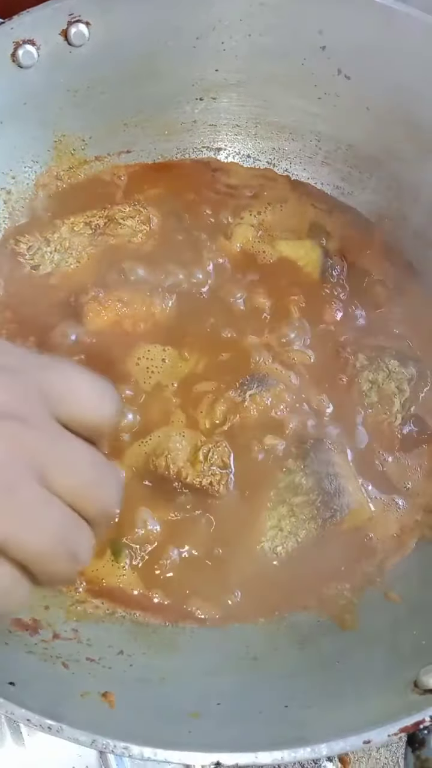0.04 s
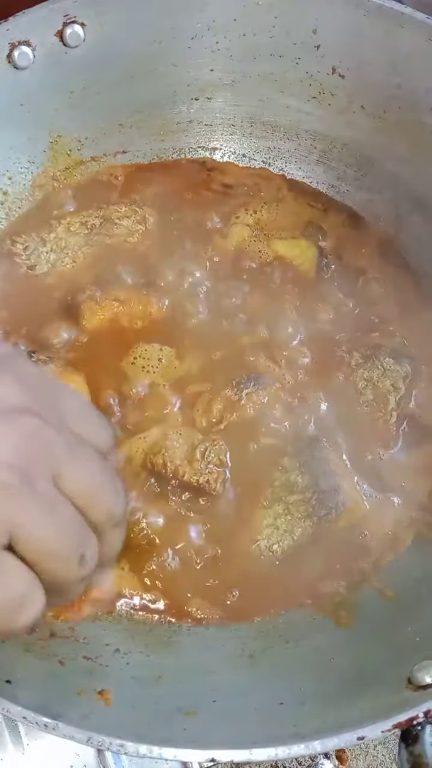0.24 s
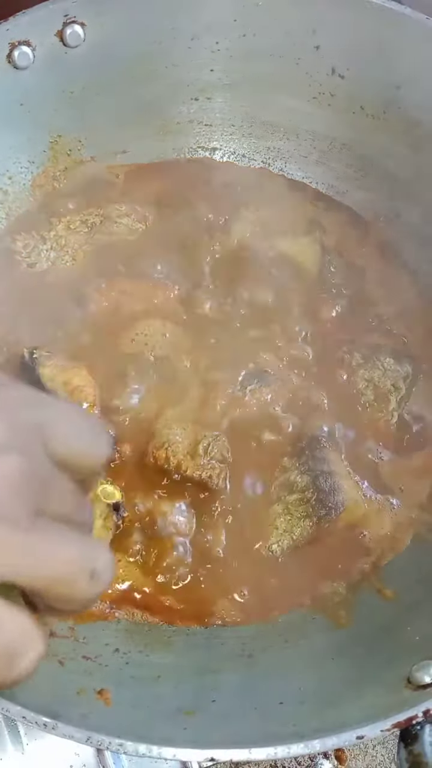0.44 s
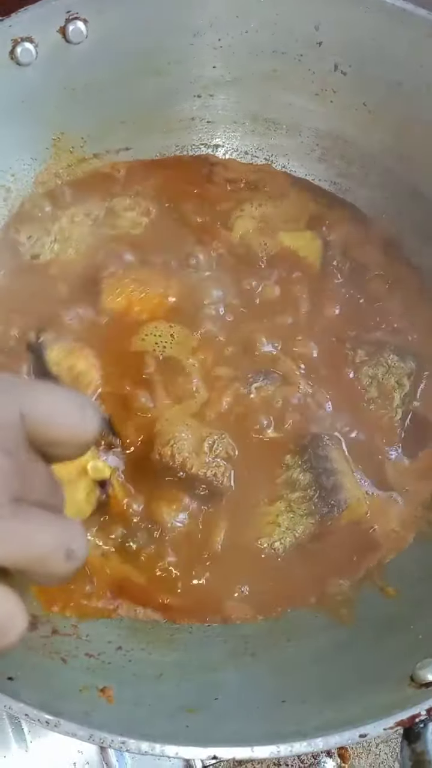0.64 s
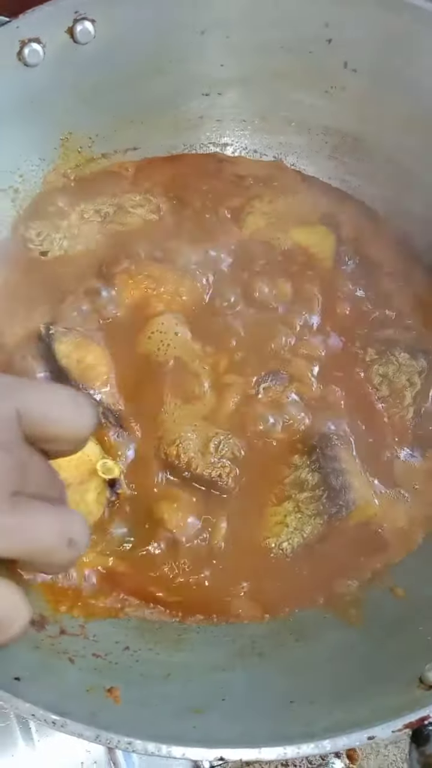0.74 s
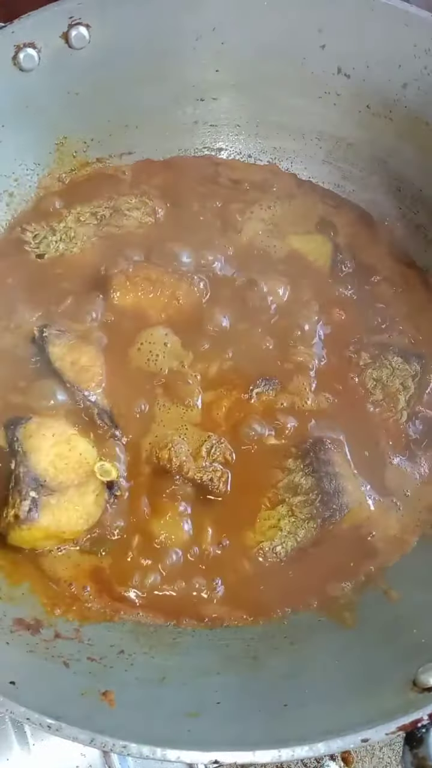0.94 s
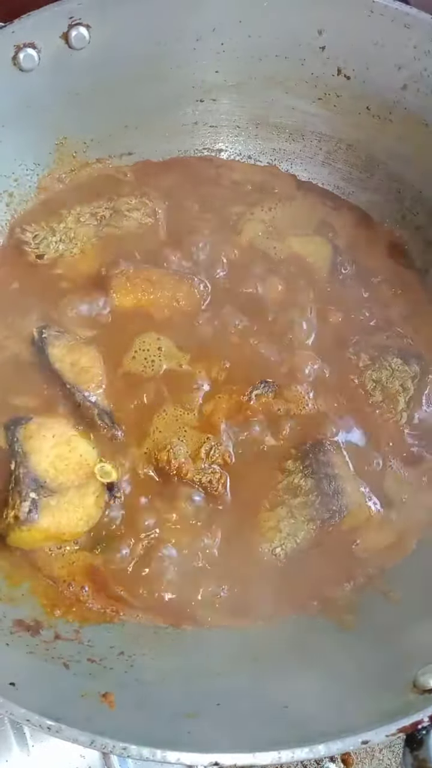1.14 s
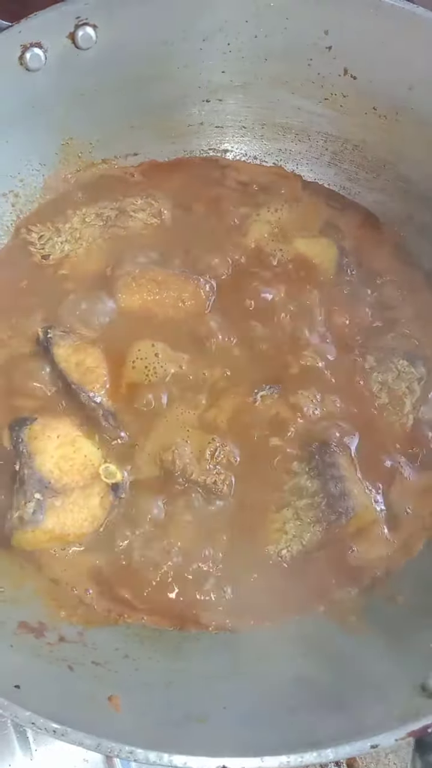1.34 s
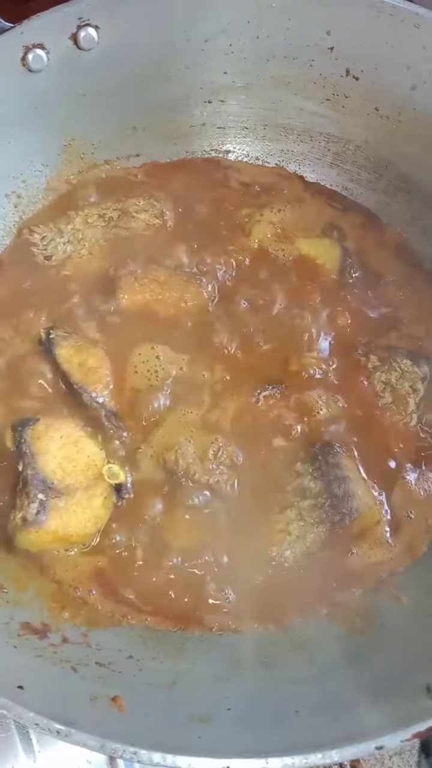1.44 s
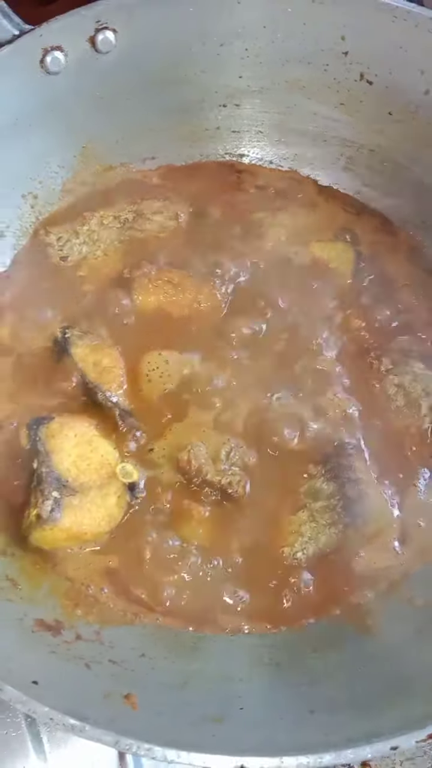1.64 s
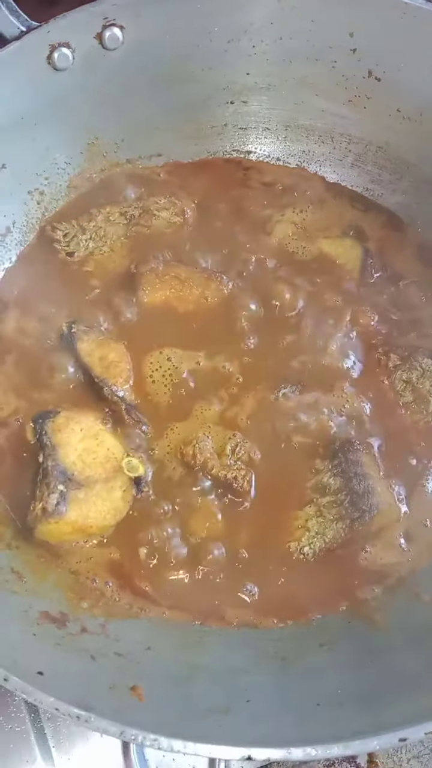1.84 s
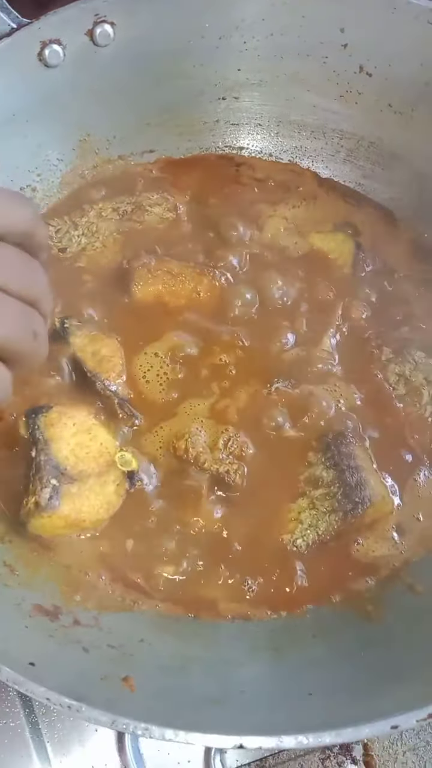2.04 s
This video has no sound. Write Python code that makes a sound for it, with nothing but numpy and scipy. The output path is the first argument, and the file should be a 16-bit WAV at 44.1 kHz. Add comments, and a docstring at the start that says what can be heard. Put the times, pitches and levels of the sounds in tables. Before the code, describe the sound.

Close above a metal pan in a small kitchen, thick sauce bubbles with small wet pops and light fizzing. A brief crackling spit and low gulp come as a piece of fish goes in, then the quiet bubbling carries on.

```python
"""In a small kitchen, thick gravy boils in a wide metal pan while a piece of fish is slipped into it.
Each bubble is a briefly excited resonator: bursting ones pop, big ones gulp low in the sauce, and tiny
oil films tick and fizz. Once the gravy spits in sharp cracks of noise and sloshes around the fish.
The damped modes of the pan and the reverberation of the room prolong these sounds over a soft low wash."""
import sys
import numpy as np
from scipy import signal
from scipy.fft import rfft, irfft, next_fast_len
from scipy.io import wavfile

SR = 44100
rng = np.random.default_rng(int(sys.argv[2]) if len(sys.argv) > 2 else 0)


def file_out(sig):
    """Save sig as 16-bit WAV at sys.argv[1]."""
    # one column per channel
    cols = np.atleast_2d(sig).T
    # limit, then scale
    lim = np.clip(cols, -1, 1)
    pcm = np.round(lim * 32767).astype(np.int16)
    wavfile.write(sys.argv[1], SR, pcm)


N = 92610

TOP_HZ = 15600
TICK_GLIDE, POP_GLIDE = 0.031, 0.0083  # fractional rise in frequency per rise time
# bursting bubbles: t/s, f/Hz, peak level/dB, rise/cycles
BURSTS = [(.021, 1500, -53, 3), (.0376, 1550, -59.5, 2.9), (.0515, 1520, -55, 1.73),
          (.0686, 1593, -54, 1.76), (.0845, 1644, -41, 4), (.1632, 1553, -46.5, 3), (.203, 1580, -39, 4.5),
          (.2335, 3240, -43, 2.1), (.2361, 2310, -39, 2.55), (.323, 2400, -54, 4), (.352, 1539, -47, 3.3),
          (.3783, 1550, -44.5, 5), (.434, 1680, -40.5, 2.14), (.5494, 2400, -51.5, 3),
          (.5636, 1580, -45, 2.95), (.6145, 1590, -48.5, 5.4), (.6283, 1470, -55, 4),
          (.6772, 1120, -46.5, 1.7), (.713, 1630, -46, 4.8), (.7709, 1290, -52, 1.9),
          (.8393, 1530, -46, 2.58), (.84, 1990, -56, 2.9), (.8537, 1580, -67, 3.6),
          (.855, 1960, -53.5, 4.7), (.935, 1320, -55.5, 2.62), (.9756, 1440, -42.5, 1.9),
          (1.0174, 1570, -46.5, 0.91), (1.02, 690, -58.5, 3.9), (1.0992, 1065, -56, 3.3),
          (1.1207, 1510, -44, 2.1), (1.1247, 1550, -44, 2.6), (1.2106, 1530, -48, 0.76),
          (1.213, 740, -55.5, 3.86), (1.2227, 1390, -46.5, 2.35), (1.2565, 2110, -39.5, 2.14),
          (1.258, 1326, -38, 3.27), (1.2725, 1400, -80, 3), (1.324, 1470, -55.5, 3),
          (1.4081, 1990, -51.5, 2.1), (1.41, 1015, -59.5, 4.5), (1.489, 1320, -57, 3),
          (1.826, 1260, -58, 3), (1.867, 1370, -43, 2.62), (1.919, 1310, -53, 4), (1.921, 826, -60, 4),
          (1.99, 970, -60.5, 5.7), (2.027, 2050, -55, 4), (2.078, 710, -55.5, 1.53)]
# small films snapping at the surface: t/s, f/Hz, peak level/dB
FILM_SNAPS = [(.0095, 8900, -44.5), (0.0313, 7891, -46), (.1002, 7400, -49), (0.1209, 6500, -41.5),
              (0.1367, 3300, -42), (.1446, 6550, -40), (.186, 8100, -47.5), (0.2169, 3640, -43),
              (0.2369, 3514, -29.5), (0.2535, 6700, -38.5), (0.2626, 6600, -38), (0.311, 7700, -48),
              (0.349, 3720, -39), (.349, 6500, -37), (.3523, 6450, -33), (0.373, 6140, -45),
              (0.3817, 7260, -37), (.5744, 6740, -40.5), (0.5805, 6300, -42), (0.5973, 6804, -39.5),
              (0.6077, 5400, -49.5), (0.6495, 3850, -48), (0.6875, 4170, -51), (0.717, 8000, -43.5),
              (0.807, 5860, -47), (0.9458, 3440, -51.5), (0.9786, 6380, -39), (1.065, 4100, -52.5),
              (1.157, 6740, -43), (1.2071, 7040, -45.5), (1.2443, 5500, -42), (1.2691, 5500, -61),
              (1.2895, 7741, -44), (1.3262, 5221, -46.5), (1.339, 5460, -60), (1.3495, 6500, -45),
              (1.356, 6760, -41.5), (1.3941, 9340, -42), (1.4474, 5800, -59), (1.4592, 5900, -40),
              (1.538, 6300, -45.5), (1.5723, 6660, -37.5), (1.5845, 7200, -41), (1.596, 6800, -44.5),
              (1.672, 6200, -49.5), (1.8134, 8100, -46), (1.8631, 4950, -47.5), (1.896, 3500, -53),
              (1.9618, 6560, -39), (1.9794, 5440, -45.5), (2.0607, 5760, -46.5)]


def undb(db):
    """Amplitude ratio of a level in decibels."""
    return 10 ** (np.asarray(db) / 20)


def unit(x):
    """Normalisation to an rms of 1."""
    return x / np.sqrt(np.mean(x ** 2))


def colour(x, points):
    """Spectral shaping by (f/Hz, gain/dB) points joined on a log-frequency axis."""
    hz, db = np.array(points, float).T
    size = next_fast_len(2 * len(x))
    f = np.maximum(np.fft.rfftfreq(size, 1 / SR), 1)
    gain = undb(np.interp(np.log(f), np.log(hz), db))
    return irfft(rfft(x, size) * gain, size)[:len(x)]


def swell(u):
    """Transient envelope: growth from u = 0 to a peak of 1 at u = 1, then exponential decay."""
    u = np.maximum(u, 0)
    return (u * np.exp(1 - u)) ** 2


def bubbles(rows, glide, wobble_rad=0):
    """Cavity resonance, rising as the cavity opens. Rows: t/s, f/Hz, peak level/dB, rise/cycles."""
    out, drift = np.zeros(N), np.zeros(N)
    if wobble_rad:  # unsteady phase of a collapsing cavity
        steps, steps_per_s = rng.standard_normal(N // 20), 457.3
        drift = wobble_rad * np.interp(np.arange(N) * steps_per_s / SR, np.arange(len(steps)), steps)
    for at, hz, db, cycles in rows:
        rise = max(cycles, .5) / hz
        i = np.arange(max(int((at - rise) * SR), 0), min(int((at + 6 * rise) * SR), N))
        age = i / SR - at
        phase = 2 * np.pi * hz * (age + rise + glide * age ** 2 / rise / 2)
        out[i] += undb(db) * swell(1 + age / rise) * np.sin(phase + drift[i])
    return out


def activity(t):
    """Slow amplitude modulation: how hard the gravy boils at time t, in dB."""
    # vigour of the boil: t/s, relative level/dB
    vigour = [(0, 4), (.3, 2.5), (.45, 9.5), (.6, 5), (.76, -2), (.9, -0.5), (1.0, 2.5), (1.15, -2),
              (1.35, 3), (1.55, 0.5), (1.75, -2.5), (1.95, 2), (2.1, 1)]
    return np.interp(t, *np.array(vigour).T)


def pan_and_kitchen(x):
    """Convolution adds the damped modes of the pan and the dense reflections from nearby walls."""
    # modes of the pan: f/Hz, T60/s, relative level/dB
    modes = [(207, 0.1, -6), (690, 0.21, -12), (1380, 0.26, -3), (2120, 0.19, -2), (3000, .3, -13),
             (3140, 0.31, -7), (3238, 0.24, -7), (3680, 0.43, -9), (5090, .45, 2), (5000, 0.57, -10),
             (5525, .4, -12), (5700, 0.26, -3), (5340, 0.46, -1), (5700, 0.39, -4), (6368, .4, -7),
             (6400, .35, -1), (7160, 0.27, -3)]
    # spectrum of the reverberation: f/Hz, relative level/dB
    room_spectrum = [(60, -20.5), (220, 5), (480, -7), (800, 6.5), (1500, 2.5), (2600, -3.5), (3400, 1.5),
                     (4500, -10), (5600, 13), (6100, -9), (6700, 1), (7300, -12), (7800, -6), (9000, -8),
                     (15000, 3)]
    t = np.arange(SR // 2) / SR
    fade = lambda t60: np.exp(-np.log(1000) * t / t60)
    ring = np.zeros(len(t))
    for hz, t60, db in modes:
        unity_gain = 2 * np.log(1000) / (t60 * SR)  # at resonance
        ring += undb(db) * unity_gain * fade(t60) * np.sin(2 * np.pi * hz * t)
    noise = rng.standard_normal(len(t))
    low = signal.sosfilt(signal.butter(2, 4000, fs=SR, output="sos"), noise)
    onset = np.clip(t / 0.001 - .5, 0, 1)  # first echoes after about 1 ms
    tail = (low * fade(t60=0.17) + (noise - low) * fade(t60=0.19)) * onset
    tail = colour(tail / np.sqrt(np.sum(tail ** 2)), room_spectrum)
    return x + signal.fftconvolve(x, undb(-4) * ring + undb(-4.5) * tail)[:N]


def wash():
    """Random noise: the low churn of the whole pan over the room's rumble follows the boil."""
    # churn and rumble: f/Hz, relative spectral level/dB
    spectrum = [(25, -30), (50, -8), (100, -3), (210, -1), (300, 1), (400, 3), (500, -6.5), (650, 5),
                (1000, -16.5), (1500, -7), (1900, -45), (4000, -16.5), (15000, -21)]
    level_db = -75.5 + 0.49 * activity(np.arange(N) / SR)
    return unit(colour(rng.standard_normal(N), spectrum)) * undb(level_db)


def fizz(clicks_per_s=6000, scatter_db=4):
    """Shot noise: frying oil films give countless minute clicks, coloured by the pan."""
    # fizz: f/Hz, relative spectral level/dB
    spectrum = [(100, -43), (1500, -13), (2000, -9.5), (2600, -17.5), (3400, -4.5), (4300, -13),
                (5000, 1.5), (5600, -3.5), (6100, -11.5), (6700, 12), (7300, -11.5), (7750, 8.5),
                (8600, -7), (10500, -3), (11300, -49), (15000, -43.5)]
    present = rng.random(N) < clicks_per_s / SR
    size = undb(scatter_db * np.minimum(rng.exponential(size=N), 5))
    clicks = present * size * rng.choice([-1, 1], N)
    return unit(colour(clicks, spectrum)) * undb(-68.5 + activity(np.arange(N) / SR))


def simmer():
    """Incoherent superposition: crowds of faint bubbles of every size ring at random moments."""
    # crowds: rate/(1/s), centre f/Hz, spread/octaves, base level/dB, scatter/dB, mean rise/cycles
    crowds = [(109.7, 1007, 0.43, -71.5, 2, 2.2), (61.2, 1454, 0.03, -65.5, 3, 3.014),
              (36.3, 3450, 0.061, -64.5, -0.5, 3.8), (85.5, 7600, 0.15, -58.5, 4, 2.23),
              (57.9, 211.7, 0.22, -78, -1.5, 2.59)]
    out = np.zeros(N)
    for rate, centre, spread, db, scatter, cycles in crowds:
        moment, strength, duration = rng.random((1500, 3)).T
        pitch = rng.standard_normal(len(moment))
        at = moment * N / SR
        hz = np.minimum(centre * 2 ** (spread * pitch), TOP_HZ)
        level_db = db + activity(at) + scatter * np.minimum(-np.log(1 - strength), 3)
        rows = np.c_[at, hz, level_db, cycles * (.5 + duration)]
        out += bubbles(rows[:int(rate * N / SR)], TICK_GLIDE)
    return out


def slosh(peak_s=0.458, rise_s=0.11):
    """Displacement noise: a low rumble swells and settles as the fish pushes the sauce aside."""
    # moving sauce: f/Hz, relative spectral level/dB
    spectrum = [(25, -25), (50, -11), (90, 2), (160, 0), (260, 0.5), (340, -6), (480, -15), (1500, -53)]
    envelope = swell(1 + (np.arange(N) / SR - peak_s) / rise_s)
    return unit(colour(rng.standard_normal(N), spectrum)) * envelope * undb(-62.5)


def gurgles(bubbles_per_s=95, spread_octaves=0.037, rise_cycles=2.6):
    """Steam working through the sauce excites quick runs of bubble resonances that slide in pitch."""
    # runs: t/s, length/s, first f/Hz, last f/Hz, peak level/dB
    runs = [(0.442, 0.038, 717, 718, -54), (0.519, 0.054, 266, 240, -68), (0.671, 0.047, 930, 1070, -59.5),
            (0.77, 0.044, 1130, 804, -58), (0.816, 0.021, 980, 1110, -54), (1.011, 0.031, 640, 610, -56.5),
            (1.199, 0.067, 860, 1050, -58.5), (1.362, 0.12, 820, 1064, -61), (1.613, .1, 1400, 1020, -63),
            (1.884, 0.029, 1420, 1300, -61.5)]
    out = np.zeros(N)
    for start, length, first, last, db in runs:
        jitter = rng.random(32)
        pitch, scatter_db = rng.standard_normal((2, 32))
        after = (np.arange(32) + jitter) / bubbles_per_s
        hz = np.interp(after, [0, length], [first, last]) * 2 ** (spread_octaves * pitch)
        rows = np.c_[start + after, hz, db + scatter_db, np.full(32, rise_cycles)]
        out += bubbles(rows[after < length], POP_GLIDE)
    return out


def splutters(snaps_per_s=400, rise_cycles=2.28):
    """Rapid trains of tiny damped oscillations. Those centred below 10 kHz are collapsing foam;
    the three above are brief patches of faint, very high hiss."""
    # trains: t/s, length/s, centre f/Hz, spread/octaves, peak level/dB
    trains = [(0.04, .03, 2520, 0.39, -56.5), (.21, .03, 3130, 0.42, -54), (0.358, .025, 4500, 0.41, -50),
              (.383, .012, 3800, 0.18, -31.5), (0.427, .075, 6030, 0.37, -45),
              (0.536, .025, 2410, 0.14, -57), (0.566, .02, 2770, 0.42, -54.5),
              (0.568, .03, 10200, 0.11, -51.5), (0.603, .035, 2080, 0.42, -58),
              (0.636, .015, 11600, .2, -57), (0.834, .02, 3770, 0.23, -62.5),
              (0.934, .035, 3200, 0.28, -61.5), (1.009, .03, 1860, 0.083, -59.5),
              (1.062, .02, 4800, 0.39, -55), (1.209, .03, 2070, 0.095, -60.5),
              (1.251, .022, 4630, 0.21, -54), (1.334, .035, 10600, 0.17, -60),
              (1.405, .025, 2610, 0.11, -57.5), (1.456, .022, 4370, 0.2, -55.5),
              (1.482, .035, 2480, 0.16, -63.5), (1.552, .03, 3780, 0.33, -60.5),
              (1.9, .035, 3040, 0.3, -66), (2.041, .035, 4440, 0.27, -69)]
    out = np.zeros(N)
    for start, length, centre, spread, db in trains:
        jitter = rng.random(64)
        pitch, scatter = rng.standard_normal((2, 64))
        after = (np.arange(64) + jitter) / snaps_per_s
        hz = np.minimum(centre * 2 ** (spread * pitch), TOP_HZ)
        rows = np.c_[start + after, hz, db - 0.5 * scatter, np.full(64, rise_cycles)]
        out += bubbles(rows[after < length], TICK_GLIDE)
    return out


def droplets(count=3, delay_s=.004, spread_octaves=.33, rise_cycles=1.6):
    """Secondary impacts: every burst and snap throws droplets that patter back just after it."""
    parents = np.array([row[:3] for row in BURSTS + FILM_SNAPS], float)
    at, hz, db = np.repeat(parents, count, axis=0).T
    delay, pitch, scatter = rng.standard_normal((len(at), 3)).T
    landing = at + delay_s * np.abs(delay)
    hz = np.minimum(hz * 2 ** (spread_octaves * pitch), TOP_HZ)
    return bubbles(np.c_[landing, hz, db - 15 + 2 * scatter, np.full(len(at), rise_cycles)], TICK_GLIDE)


def gulps():
    """Large gas volumes resonate low: big bubbles heave in the sauce."""
    # big bubbles: t/s, f/Hz, peak level/dB, rise/cycles
    big_bubbles = [(.01, 151, -62, 2.2), (.43, 215.6, -42.5, 3.04), (.46, 278, -44, 2.33),
                   (.463, 664, -55.5, 9), (.5, 220, -52.5, 4.43), (.465, 346, -51, 2.2),
                   (.55, 150.6, -60.5, 3.05), (.585, 235, -61, 1.03), (.67, 211, -64, 3.15),
                   (.835, 162, -61.5, 2.5), (.85, 214, -62.5, 1.83), (1.035, 214, -59.5, 2.8),
                   (1.05, 106, -69, 2.1), (1.405, 221, -63.5, 3), (1.82, 221, -64, 2.9),
                   (1.875, 216.5, -56.5, 3.54)]
    return bubbles(big_bubbles, glide=0.0067)


def ticks(rise_cycles=3.27):
    """Small cavities resonate high: films snap at the surface with brief ticks."""
    return bubbles([(at, hz, db, rise_cycles) for at, hz, db in FILM_SNAPS], TICK_GLIDE, wobble_rad=0.28)


def pops():
    """Impulsive excitation: each bursting bubble sets its cavity ringing with a short pitched pop."""
    return bubbles(BURSTS, POP_GLIDE, wobble_rad=0.25)


def spits():
    """Broadband transients: hot gravy spits in cracks of noise, each some milliseconds long."""
    # cracks: t/s, rms level at the peak/dB, rise/s, low-pass f/Hz
    cracks = [(.3882, -25, 0.00043, 7400), (.39, -27, 0.00062, 7200), (0.397, -34, 0.0022, 9100),
              (.3993, -18.5, 0.00086, 15200), (.401, -19.5, 0.00066, 15300), (0.408, -34, 0.0055, 14800),
              (0.4115, -38, 0.003, 14700), (.4545, -33, .0004, 15000)]
    # spitting gravy: f/Hz, relative spectral level/dB
    spectrum = [(80, -68), (400, -29), (1000, -74), (1500, -9.5), (1900, -9), (2300, -10.5), (3000, -4),
                (4000, -7), (4700, -13.5), (5600, -2.5), (6700, 5.5), (7300, -7), (8000, 4.5), (9500, -10),
                (15000, -11.5)]
    t, out = np.arange(N) / SR, np.zeros(N)
    for at, db, rise, cutoff_hz in cracks:
        noise = colour(rng.standard_normal(N), spectrum)
        noise = signal.sosfilt(signal.butter(4, cutoff_hz, fs=SR, output="sos"), noise)
        envelope = swell(1 + (t - at) / rise)
        out += undb(db) * unit(noise * envelope) * np.sqrt(np.mean(envelope ** 2))
    return out


def scene():
    """Linear superposition of all the sources, heard from just above the pan."""
    surface = pops() + ticks() + droplets()
    gravy = surface + gulps() + gurgles() + simmer() + splutters() + spits() + fizz() + slosh()
    return (pan_and_kitchen(gravy) + wash())[None]


def record(dry):
    """Band limiting: a steep elliptic low-pass cuts the highest treble."""
    return signal.sosfilt(signal.ellip(10, .2, 80, TOP_HZ, fs=SR, output="sos"), dry)


dry = scene()
out = record(dry)
file_out(out)
```